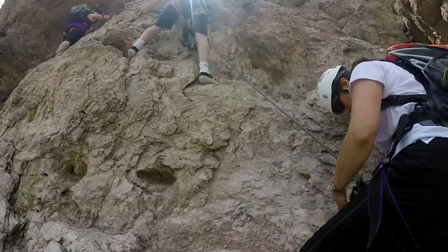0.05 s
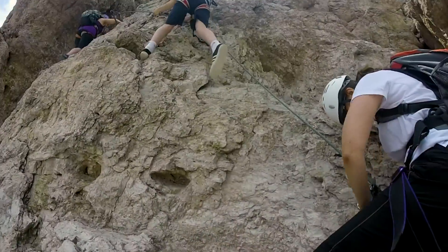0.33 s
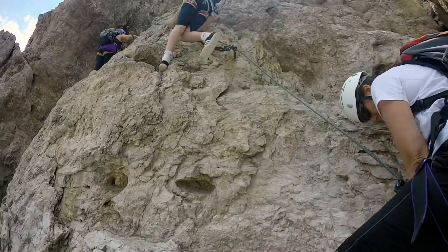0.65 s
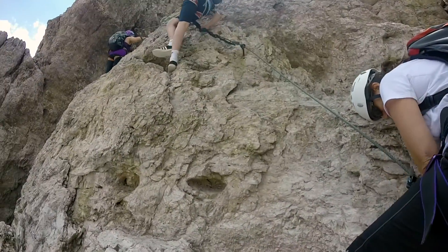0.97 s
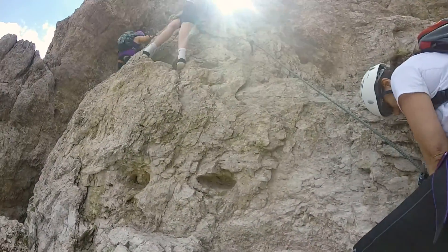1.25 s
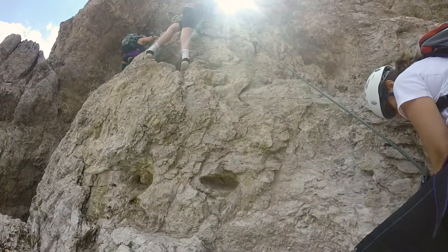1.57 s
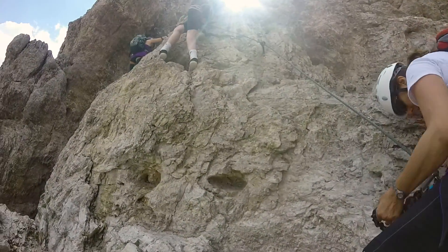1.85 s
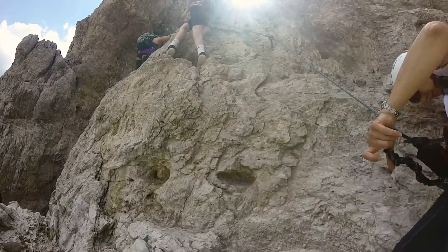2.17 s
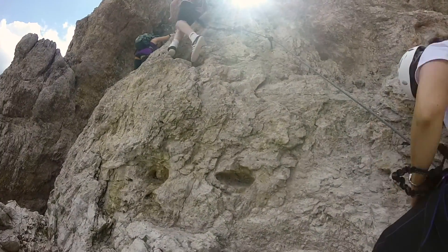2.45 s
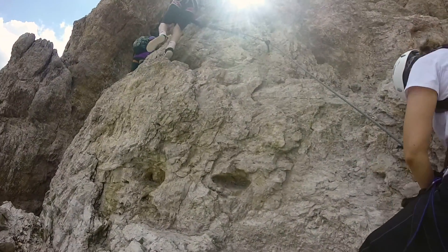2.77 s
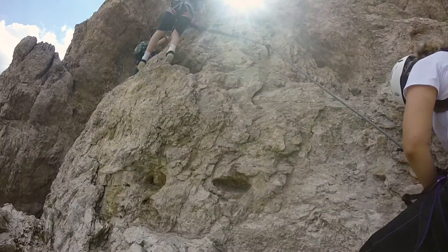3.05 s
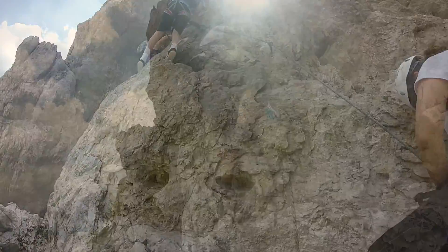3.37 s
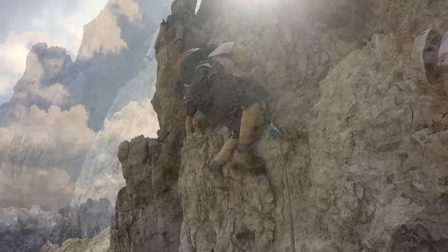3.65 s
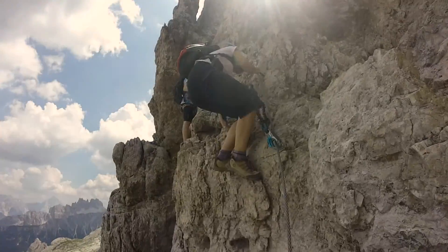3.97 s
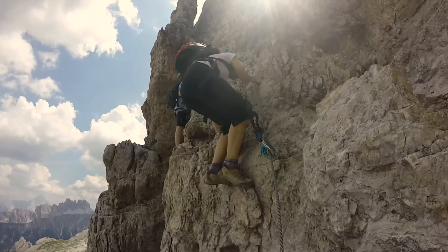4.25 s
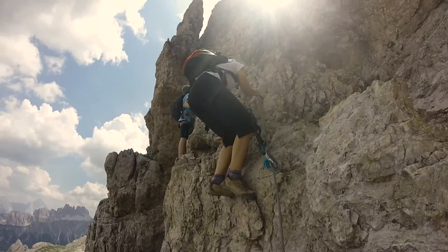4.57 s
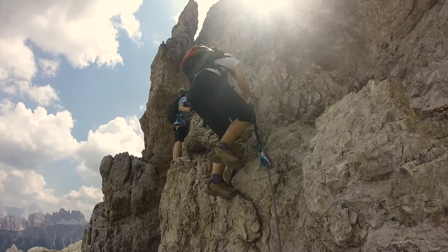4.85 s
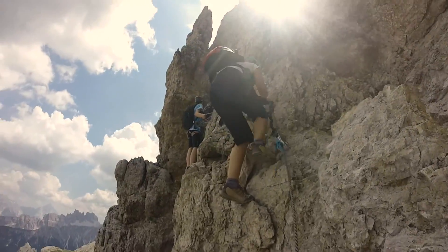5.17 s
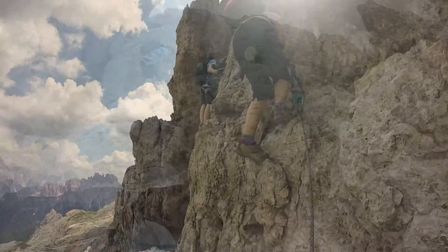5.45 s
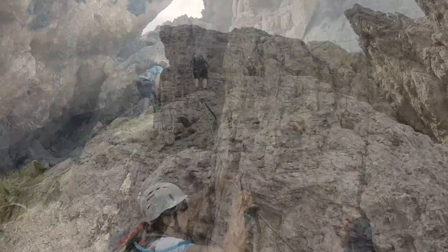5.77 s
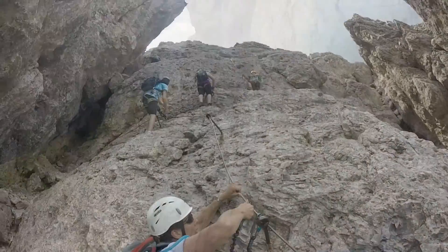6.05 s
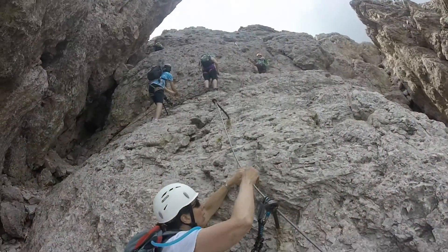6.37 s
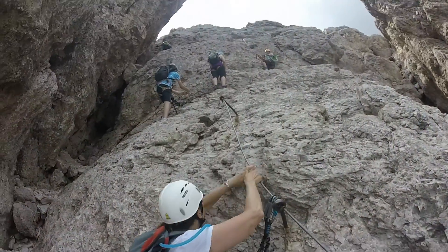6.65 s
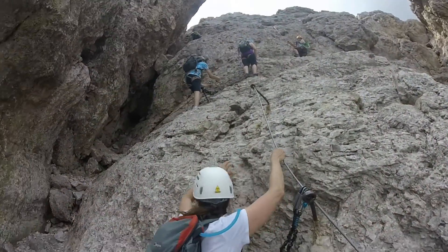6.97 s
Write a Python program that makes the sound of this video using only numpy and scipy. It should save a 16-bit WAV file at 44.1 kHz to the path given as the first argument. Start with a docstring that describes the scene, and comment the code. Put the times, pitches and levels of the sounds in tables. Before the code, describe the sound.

Close metal clicks and scrapes of a carabiner on a steel cable, followed by fainter rattling gear and soft wind rumble.

```python
"""Climbers move along a steel cable fixed to a rock face, in a light rush of mountain air.
First, close by, a carabiner's sprung gate scrapes open and snaps shut; sticking metal squeaks faintly.
From 1 s the carabiner skips along the cable, giving an even run of ticks, one for each strand crossed.
Around 2 s it is dragged hard, rasping and knocking, and then it clinks against its twin.
From about 4 s other climbers' gear clatters farther off while gusts rumble on the microphone."""
import sys
import numpy as np
from scipy import signal
from scipy.fft import rfft, irfft
from scipy.io import wavfile
from scipy.ndimage import uniform_filter1d, minimum_filter1d

SR = 44100
rng = np.random.default_rng(int(sys.argv[2]) if len(sys.argv) > 2 else 0)


def unload_audio(sound):
    """Save the sound as a 16-bit wav file, at the path given as the first command line argument."""
    columns = np.transpose(np.atleast_2d(sound))
    # keep every value between -1 and 1, then stretch to whole-number steps
    steps = np.round(np.clip(columns, -1, 1) * 32767)
    wavfile.write(sys.argv[1], SR, steps.astype(np.int16))


N = 317916


def amp(db):
    """Turns decibels into a number to multiply by."""
    return 10 ** (np.asarray(db) / 20)


def unit(x):
    """Scales a sound to an average strength (rms) of 1."""
    return x / np.sqrt(np.mean(x ** 2) + 1e-20)


def level_at(colour, hz):
    """Reads the level in dB at any pitch from rows of pitch_hz, level_db."""
    pitch_hz, level_db = np.transpose(colour)
    return np.interp(np.log(hz + 1), np.log(pitch_hz + 1), level_db)


def fade(curve):
    """Turns rows of time_s, level_db into a gain for every sample, silent before and after."""
    time_s, level_db = np.transpose(curve)
    return amp(np.interp(np.arange(N) / SR, time_s, level_db, left=-120, right=-120))


def add(mix, start_s, sound):
    """Mixes a sound in at its start time."""
    part = mix[max(round(start_s * SR), 0):][:len(sound)]
    part += sound[:len(part)]


def play(rows, sound_of):
    """Plays one sound for each row of a table, at the time in its first column."""
    out = np.zeros(N)
    for start_s, *columns in rows:
        add(out, start_s, sound_of(*columns))
    return out


def noise(colour, band_hz):
    """Noise with a given colour (its balance of low and high), at strength 1 inside the band."""
    hz = np.fft.rfftfreq(N, 1 / SR)
    spectrum = rfft(rng.standard_normal(N)) * amp(level_at(colour, hz))
    in_band = (hz > band_hz[0]) * (hz < band_hz[1])
    return irfft(spectrum, N) / np.std(irfft(spectrum * in_band, N))


# How the rush of air swells and sinks: time_s, level_db
AIR_LEVELS = [(0, -49), (1.0, -49.5), (1.45, -42), (1.9, -44.5), (2.35, -48.5), (2.9, -43.5), (3.8, -57.5),
              (5.7, -59.5), (7.21, -58.5)]
# Its colour early and late: pitch_hz, level_db
AIR_EARLY_COLOUR = [(15, -46.5), (25, -25), (38, -14.5), (64, -10.5), (178, -3), (215, -2.5), (389, -5),
                    (433, -6), (4750, -19), (9300, -33), (13900, -47.5), (15500, -56.5)]
AIR_LATE_COLOUR = [(65, -21), (110, -3.5), (303, -8.5), (531, -11.5), (1800, -19.5), (2000, -18.5),
                   (7990, -32), (14300, -46.5), (15500, -38)]

def air(change_s=3.58, change_length_s=0.75, band_hz=(130, 1700)):
    """Open air makes a smooth rush whose colour changes as the place opens out."""
    late_share = np.clip((np.arange(N) / SR - change_s) / change_length_s + .5, 0, 1)
    early = np.sqrt(1 - late_share) * noise(AIR_EARLY_COLOUR, band_hz)
    late = np.sqrt(late_share) * noise(AIR_LATE_COLOUR, band_hz)
    return fade(AIR_LEVELS) * (early + late)


# How the wind's rumble rises and falls: time_s, level_db
WIND_LEVELS = [(3.4, -62), (3.76, -52), (3.95, -54), (4.39, -51.5), (6.3, -50.5), (7.21, -57)]
# Its deep colour: pitch_hz, level_db
WIND_COLOUR = [(8.8, -33.5), (15, 5), (59, -9), (72, -14), (102, -20.5), (130, -24.5), (170, -33),
               (290, -120)]
# Single puffs of air: start_s, length_s, level_db, pitch_hz
PUFFS = [(0.0, 0.059, -41, 59), (3.61, 0.074, -48, 58.5), (3.729, 0.11, -48, 64), (4.38, 0.082, -44, 54.7),
         (4.942, 0.06, -38.5, 52.3), (5.7, 0.075, -44.5, 66.4)]

def wind(gust_db=1.5):
    """Wind on the microphone makes a lumpy rumble, with a few short puffs."""
    swirls = np.interp(np.arange(N), np.linspace(0, N, 90), rng.standard_normal(90))
    out = amp(gust_db * swirls) * fade(WIND_LEVELS) * noise(WIND_COLOUR, band_hz=(20, 90))
    for start_s, length_s, db, hz in PUFFS:
        t = np.arange(int(length_s * SR)) / SR
        tone = np.sin(2 * np.pi * (hz * t + rng.random()))
        add(out, start_s, amp(db) * unit(np.hanning(len(t)) * tone))
    return out


def ring(tones, ring_s, detune=0.0089, scatter_db=2.4, rise_s=0.00021):
    """Struck metal rings: one row per tone, a little different each time, 60 dB down after ring_s."""
    hz, db = np.transpose(tones)[:, :, None]
    shift, strength, phase = rng.standard_normal((3, len(tones), 1))
    t = np.arange(int(SR * ring_s)) / SR
    swing = np.sin(2 * np.pi * (hz * (1 + detune * shift) * t + phase))
    rise_and_fall = np.exp(-np.log(1000) * t / ring_s) * (1 - np.exp(-t / rise_s))
    return amp(db + scatter_db * strength) * rise_and_fall * swing


def with_grit(tones, grit_db, count=30):
    """Adds many weak tones of strands and fittings, different at each spot that is touched."""
    hz = rng.uniform(.88 * tones[0][0], 1.04 * tones[-1][0], count)
    return np.vstack([tones, np.column_stack([hz, level_at(tones, hz) + grit_db])])


def contact(chatter_s, bounces_per_s=5000, touch_s=0.0015, stretch=1.9):
    """Metal meets metal in a flurry of tiny bounces that builds quickly and dies out."""
    progress = np.linspace(0, 1, int(SR * (touch_s + stretch * chatter_s)) + 30)
    bounces = rng.standard_normal(SR // 10) * (rng.random(SR // 10) < bounces_per_s / SR)
    bounces[SR // 2000] = 1.5  # always at least one firm bounce
    return np.resize(bounces, len(progress)) * np.sin(np.pi * np.sqrt(progress))


LOW_BELOW_HZ, HIGH_ABOVE_HZ = 3700, 7000  # the middle tones lie between these

def hit(tones, ring_s, grit_db, db, chatter_s, low_db, high_db, boost_hz=0, boost_db=0, width_hz=450):
    """A hit rings the metal: db sets the middle tones; low_db and high_db are counted from there."""
    tones = with_grit(tones, grit_db)
    # the spot where it lands favours the tones near boost_hz
    boost = amp(boost_db * np.exp(-((tones[:, :1] - boost_hz) / width_hz) ** 2))
    rings = ring(tones, ring_s) * boost
    force = contact(chatter_s)
    band = np.searchsorted([LOW_BELOW_HZ, HIGH_ABOVE_HZ], tones[:, 0])
    low, middle, high = (unit(signal.fftconvolve(force, rings[band == k].sum(0))) for k in range(3))
    sound = amp(low_db) * low + middle + amp(high_db) * high
    # the level is the hit's energy spread over a hundredth of a second
    return amp(db) * sound * np.sqrt(SR / 100 / len(middle))


def strand_ticks(pushes, chatter_share, uneven_s=0.0006, uneven_db=1.5, uneven_chatter=0.35):
    """Each push gives one tick per strand, evenly spaced but no two quite alike."""
    for start_s, count, per_s, first_db, last_db, *colour in pushes:
        for k, db in enumerate(np.linspace(first_db, last_db, round(count))):
            late, harder, longer = rng.standard_normal(3)
            time_s = start_s + k / per_s + uneven_s * late
            chatter_s = chatter_share / per_s * np.exp(uneven_chatter * longer)
            yield time_s, db + uneven_db * harder, chatter_s, *colour


def drag(pulls, tones, ring_s, grit_db, uneven_db, treble_db, ticks_per_s=230, spots=5):
    """Twisted strands tick at random against a sliding carabiner, at several spots at once."""
    out = np.zeros(N)
    for _ in range(spots):
        spot_tones = with_grit(tones, grit_db)
        treble_cut = amp(treble_db * (spot_tones[:, :1] > HIGH_ABOVE_HZ))
        ticks = rng.random(N) < ticks_per_s / SR
        strength = amp(uneven_db * np.clip(rng.standard_normal(N), -2, 2))
        ringing = (treble_cut * ring(spot_tones, ring_s)).sum(0)
        out += signal.oaconvolve(ticks * strength, ringing)[:N]
    return unit(out) * sum(fade(pull) for pull in pulls)


def rock_echo(sound, echo_db, tail_s, echoes_per_s=4000, delay_s=.003):
    """The broken rock face scatters the sound back as a short, thin tail."""
    t = np.arange(SR // 3) / SR
    echoes = rng.choice([-1., 1.], len(t)) * (rng.random(len(t)) < echoes_per_s / SR) * (t > delay_s)
    echoes *= np.exp(-np.log(1000) * t / tail_s)
    return sound + amp(echo_db) * signal.oaconvolve(sound, echoes / np.linalg.norm(echoes))[:N]


# The tight cable sings farther off: start_s, length_s, level_db, pitch_hz
CABLE_NOTES = [(4.73, 0.12, -64, 2150), (4.93, 0.36, -61, 2450), (6.93, 0.073, -67.5, 2240),
               (7.09, 0.13, -65.5, 2330)]

def singing_cable(ring_s=0.028):
    """Rubbing keeps one tone of the cable going: faint and fuzzy, it swells and fades."""
    def note(length_s, db, hz):
        n = int(length_s * SR)
        rub = rng.standard_normal(SR)[:n] * np.hanning(n)
        return amp(db) * unit(signal.fftconvolve(rub, ring([(hz, 0)], ring_s)[0]))
    return play(CABLE_NOTES, note)


# The tones that distant gear rings with: pitch_hz, level_db
FAR_TONES = [(2450, 1.5), (2680, 1.5), (3480, 3), (4480, -4.5), (4780, 5.5), (5250, -5.5), (5780, 1),
             (6300, -7), (6950, -11.5), (7400, 1), (7850, 2.5), (8900, -1), (10500, 0), (13300, -9)]
# Its single knocks: start_s, level_db, chatter_s, low_db
FAR_KNOCKS = [(3.9306, -45, 0.0049, -7), (4.9737, -57, 0.0025, 6), (4.9986, -40.5, 0.0012, 0),
              (5.2211, -39, 0.0034, -9), (5.2548, -38, 0.0089, -10), (5.3043, -47, 0.0053, -16),
              (6.0069, -47, 0.0032, -10), (6.0912, -42, 0.0017, -5.5), (6.2652, -38.5, 0.006, -9.5)]
# Its rattles along the cable: start_s, strand_count, strands_per_s, first_db, last_db, low_db
FAR_RATTLES = [(4.8067, 3, 38.3, -54.5, -49.5, 1), (5.0176, 2, 43, -47.5, -38.5, 1),
               (5.1106, 8, 82, -49, -42.5, -5.5), (5.4591, 4, 43, -46.5, -50.5, -10.5),
               (5.7323, 5, 29.5, -55, -55.5, -10), (6.1787, 3, 45, -47.5, -49, -9),
               (6.2941, 4, 44, -52, -49.5, -7)]
# Its slides, one list for each pull: time_s, level_db
FAR_PULLS = [
    [(3.86, -52), (4.176, -58.5), (4.2, -74)],
    [(4.76, -73), (5.198, -50.5), (5.57, -61.5)],
    [(6.16, -61), (6.262, -53.5), (6.4, -69)],
]

def far_gear(ring_s=.012, grit_db=-5, high_db=-10):
    """Other climbers' gear knocks, rattles and slides on the cable, with a longer echo off the rock."""
    def knock(db, chatter_s, low_db):
        return hit(FAR_TONES, ring_s, grit_db, db, chatter_s, low_db, high_db)
    clatter = play(FAR_KNOCKS, knock) + play(strand_ticks(FAR_RATTLES, chatter_share=0.23), knock)
    slides = amp(-4.0) * drag(FAR_PULLS, FAR_TONES, ring_s, grit_db, uneven_db=-1.5, treble_db=-13)
    return rock_echo(clatter + slides + singing_cable(), echo_db=-11, tail_s=.2)


# Thin squeaks: start_s, length_s, level_db, pitch_hz
SQUEAKS = [(0.267, 0.037, -60, 3570), (0.618, 0.026, -52, 3570), (2.618, 0.029, -44.5, 3550)]
# The tones in each squeak: pitch_multiple, level_db
SQUEAK_TONES = [(1, -2), (2, 0.5), (3, -8.5), (4, -5)]

def squeaks(waver=.003):
    """Metal sticks and slips, squeaking on an unsteady pitch."""
    out = np.zeros(N)
    for start_s, length_s, db, hz in SQUEAKS:
        n = int(length_s * SR)
        wobble = unit(uniform_filter1d(rng.standard_normal(n), size=100))
        cycles = np.cumsum(hz * (1 + waver * wobble)) / SR
        tone = sum(amp(tone_db) * np.sin(2 * np.pi * round(k) * cycles) for k, tone_db in SQUEAK_TONES)
        add(out, start_s, amp(db) * unit(tone * np.hanning(n)))
    return out


# The tones that a free carabiner rings with: pitch_hz, level_db
CARABINER_TONES = [(2650, -4), (3480, -10), (4680, 6.5), (5450, -5.5), (5820, 0.5), (6200, 1.5),
                   (7400, -9.5), (7920, 5.5), (9080, 2), (9750, -1), (10200, -1.5), (13200, -22.5)]
# Short scrapes as the gate opens, then taps against its twin:
# start_s, level_db, chatter_s, high_db, boost_hz
SCRAPES_AND_TAPS = [(0.0306, -25.5, 0.0003, -12, 5170), (0.0595, -30, 0.016, -34, 4700),
                    (0.091, -27, 0.013, -13, 4900), (1.7607, -22, 0.0013, -16, 5470),
                    (2.6046, -25, 0.0046, -12, 4670), (2.6221, -30, 0.0054, -7.5, 4600),
                    (2.686, -27.5, 0.0017, -12, 4680), (2.9273, -28.5, 0.0017, -6, 5370),
                    (2.9991, -30, 0.0044, -11, 5550), (3.3216, -45, 0.0034, -13, 5500),
                    (3.4211, -36, 0.014, -27, 6200), (3.4834, -31, 0.0025, -14, 5800),
                    (3.8017, -38, 0.0033, -17.5, 5260), (3.8519, -50, 0.004, -29, 4600)]

def scrapes_and_taps(ring_s=0.025, grit_db=-15, low_db=-20):
    """The opening gate or a tap from its twin rings the carabiner; slings and hands soon stop it."""
    def touch(db, chatter_s, high_db, boost_hz):
        return hit(CARABINER_TONES, ring_s, grit_db, db, chatter_s, low_db, high_db, boost_hz, boost_db=13)
    return rock_echo(play(SCRAPES_AND_TAPS, touch), echo_db=-12, tail_s=.13)


# The tones of the carabiner's gate and of its spring: pitch_hz, level_db
GATE_TONES = [(2400, -8.5), (2620, 1), (3050, -10), (3550, -2), (4070, -9), (4680, -0.5), (5880, -3),
              (6240, 2), (8150, -8.5), (9050, 8), (10220, -1.5), (12400, -14), (13400, -14.5)]
SPRING_TONES = [(5880, -2), (6240, -6), (10220, -5.5)]
# The gate shuts: start_s, level_db, chatter_s, low_db, high_db, boost_hz
SNAPS = [(0.1171, -7.5, 0.0033, -6, -6, 5890)]

def gate(ring_s=.018, grit_db=-3, spring_db=-17):
    """The gate slams shut, and its spring rings on."""
    slam = play(SNAPS, lambda *row: hit(GATE_TONES, ring_s, grit_db, *row, boost_db=1.0))
    spring = play(SNAPS, lambda db, *_: amp(db + spring_db) * ring(SPRING_TONES, ring_s=0.16).sum(0))
    return rock_echo(slam + spring, echo_db=-19.0, tail_s=0.14)


# The tones of the carabiner on the cable: pitch_hz, level_db
CABLE_TONES = [(2420, -9.5), (2750, -4), (3000, -15), (3480, -2.5), (3950, -9), (4350, -7.5), (4720, 0),
               (5470, -6.5), (5740, -1), (6150, -7.5), (7300, -8), (7900, 2), (9020, -4), (9650, -8),
               (10200, -2.5), (13100, -19), (13550, -14.5)]
# It skips lightly when slack: start_s, strand_count, strands_per_s, first_db, last_db
SKIPS = [(1.039, 3, 130, -38, -41.5), (1.0837, 2, 60, -41, -40), (1.1236, 6, 53, -32.5, -32.5),
         (1.2345, 5, 31.5, -22.5, -21.5), (1.379, 5, 39.2, -26.5, -27.5)]
# It rasps when pulled: start_s, strand_count, strands_per_s, first_db, last_db, low_db, high_db
RASPS = [(1.8129, 3, 59, -35.5, -31.5, -1, -5.5), (1.9477, 12, 97, -21, -24, -3.5, -2),
         (2.1012, 5, 73, -18.5, -34.5, -6, -8.5), (2.1764, 4, 69, -23, -30.5, -10, -14),
         (2.2625, 3, 82, -34.5, -39.5, -11, -16.5), (2.3149, 3, 55, -27, -23.5, -19.5, -12.5),
         (2.369, 2, 50, -29, -24.5, -25, -20.5), (2.406, 2, 86, -27.5, -21, -9, -6)]
# It grinds over the strands, one list for each pull: time_s, level_db
NEAR_PULLS = [
    [(1.92, -31), (1.96, -11.5), (2.1, -20.5), (2.2, -28.5), (2.3, -44.5), (2.43, -26.5), (2.56, -38.5)],
    [(2.6, -43), (2.78, -33), (2.86, -51)],
]
# It catches and knocks: start_s, level_db, chatter_s
KNOCKS = [(1.6117, -34.5, 0.009), (2.0721, -26, 0.0036), (2.0838, -14.5, 0.0056), (2.2202, -11.5, 0.0046),
          (2.4411, -17.5, 0.0068), (2.4663, -37, 0.0035), (2.7696, -31.5, 0.0049)]

def carabiner_on_cable(ring_s=0.0144, grit_db=-12, skip_grit_db=-20, hard_knock_db=-13.5):
    """Light skips ring mostly the middle tones; pulled hard, the carabiner grinds and they all ring."""
    def skip(db, chatter_s):
        return hit(CABLE_TONES[3:], ring_s, skip_grit_db, db, chatter_s,
                   low_db=-21, high_db=-34, boost_hz=5660, boost_db=3.5)

    def rasp(db, chatter_s, low_db, high_db):
        return hit(CABLE_TONES, ring_s, grit_db, db, chatter_s, low_db, high_db)

    def knock(db, chatter_s):
        low_db = -18 + 0.66 * (hard_knock_db - db)  # harder knocks make the middle tones stand out
        return hit(CABLE_TONES, ring_s, grit_db, db, chatter_s, low_db, high_db=-11)
    skips = play(strand_ticks(SKIPS, chatter_share=0.17), skip)
    rasps = play(strand_ticks(RASPS, chatter_share=0.34), rasp)
    grind = drag(NEAR_PULLS, CABLE_TONES, ring_s=0.017, grit_db=-1.5, uneven_db=1, treble_db=-14.0)
    knocks = play(KNOCKS, knock)
    return rock_echo(skips + rasps + knocks + amp(-9.0) * grind, echo_db=-9.5, tail_s=0.15)


def scene():
    """Metal, air and wind, all in the centre."""
    # parts this small give off almost no bass
    no_bass = signal.butter(4, 1900, "highpass", fs=SR, output="sos")
    metal = signal.sosfilt(no_bass, gate() + scrapes_and_taps() + carabiner_on_cable() + far_gear())
    mono = metal + amp(1.16) * air() + wind() + squeaks()
    return np.array([mono, mono])


def record(dry, ceiling=.62, top_hz=15500):
    """A fast limiter turns down the hardest hits; then the very highest treble is cut."""
    allowed = np.minimum(1, ceiling / (abs(dry).max(0) + 1e-9))
    gain = uniform_filter1d(minimum_filter1d(allowed, size=90), size=90)
    treble_cut = signal.firwin(255, top_hz, window=("kaiser", 9), fs=SR)
    return signal.oaconvolve(dry * gain, treble_cut[None], "same")


dry = scene()
out = record(dry)
unload_audio(out)
```